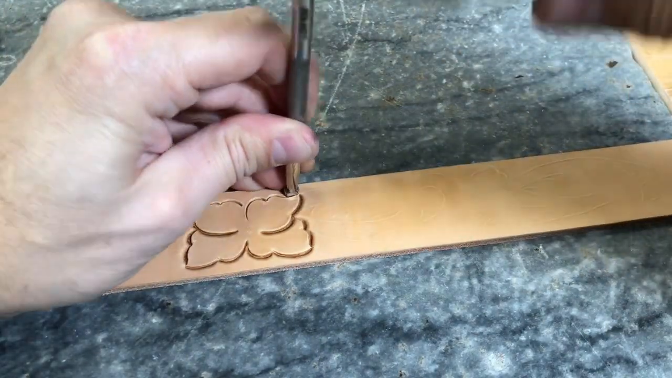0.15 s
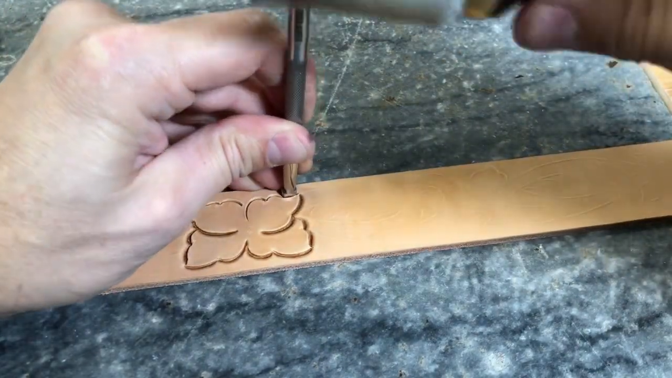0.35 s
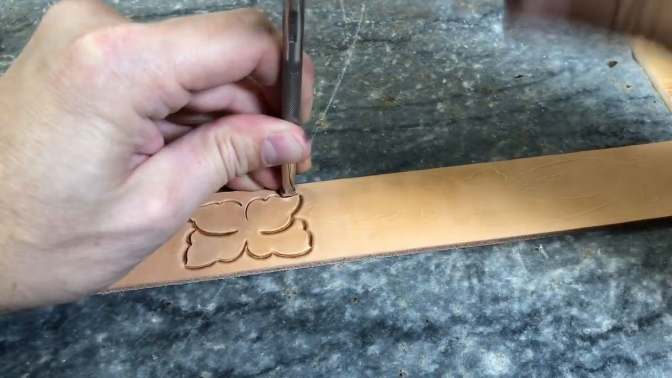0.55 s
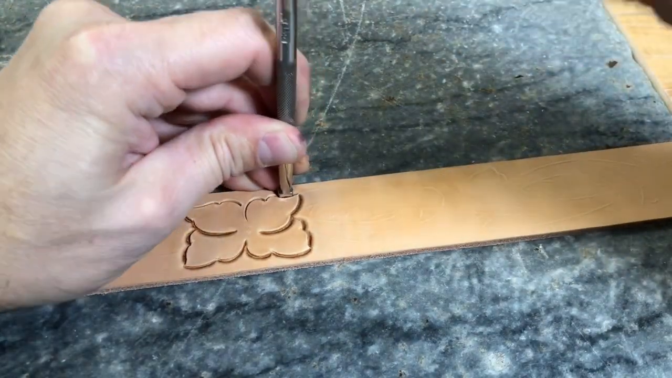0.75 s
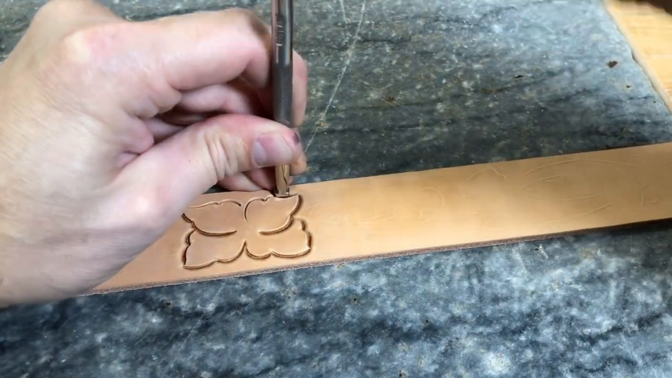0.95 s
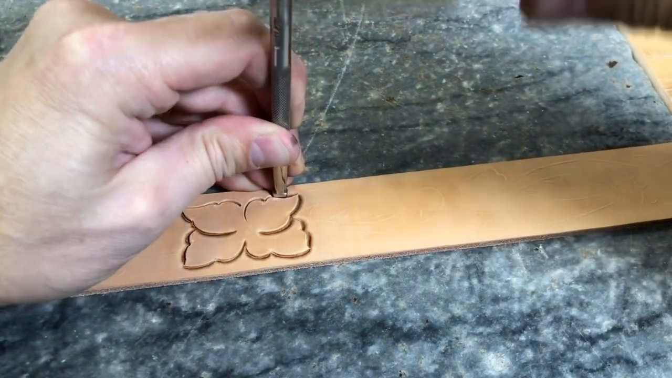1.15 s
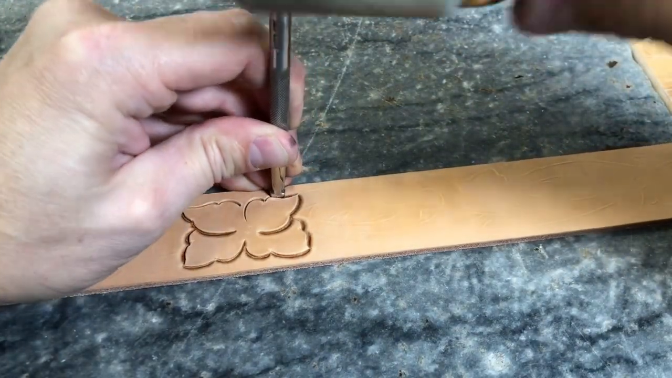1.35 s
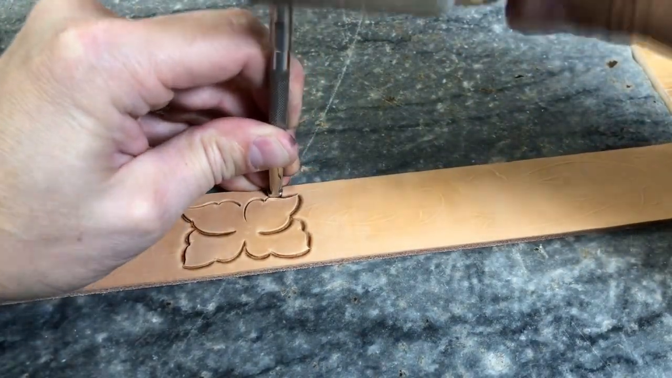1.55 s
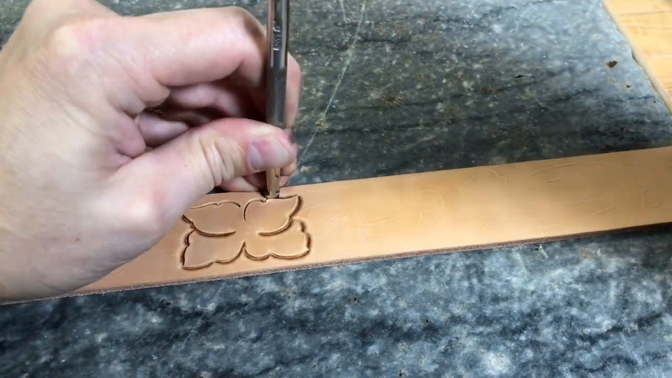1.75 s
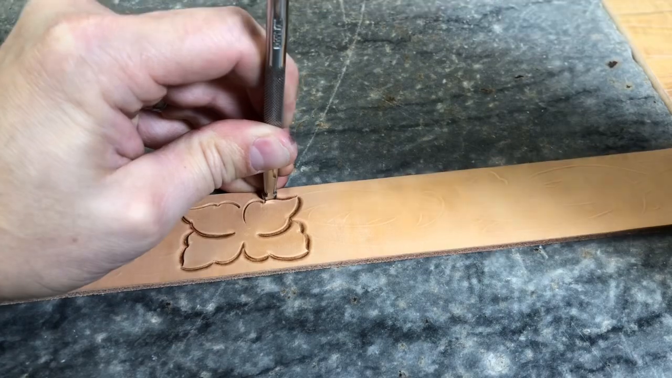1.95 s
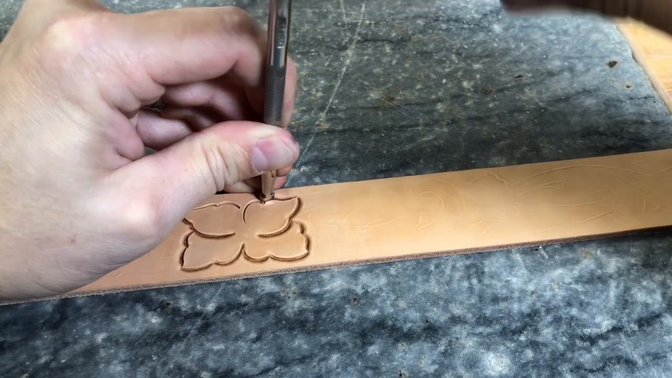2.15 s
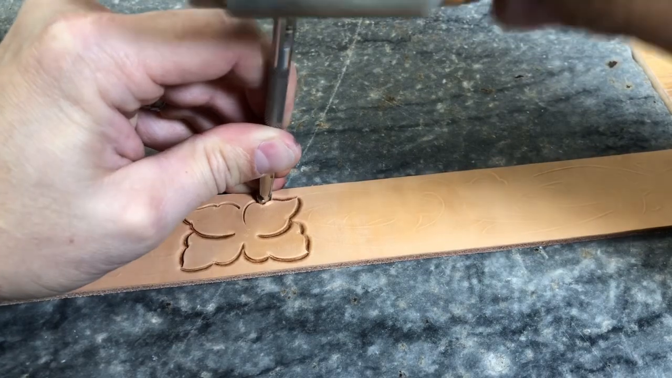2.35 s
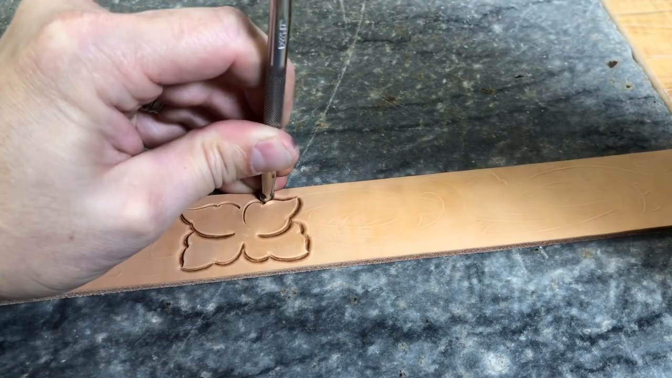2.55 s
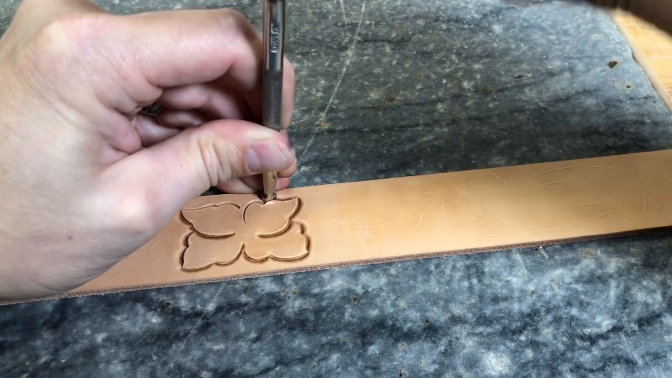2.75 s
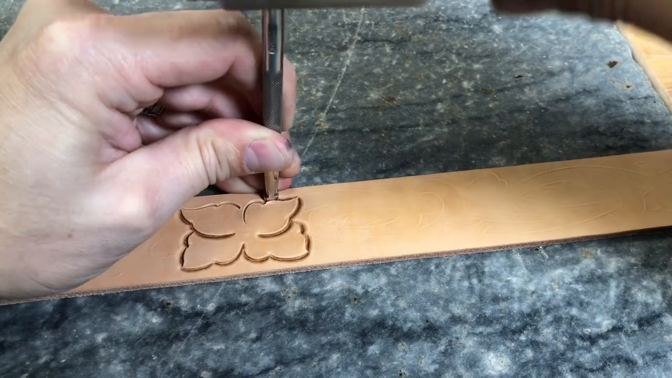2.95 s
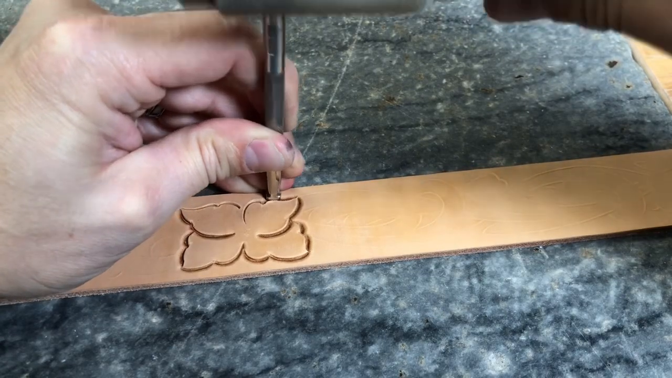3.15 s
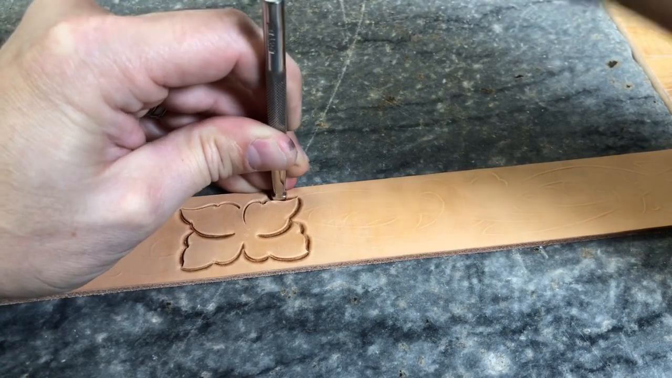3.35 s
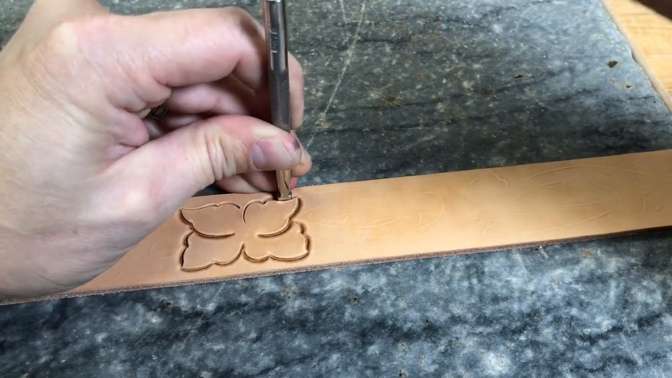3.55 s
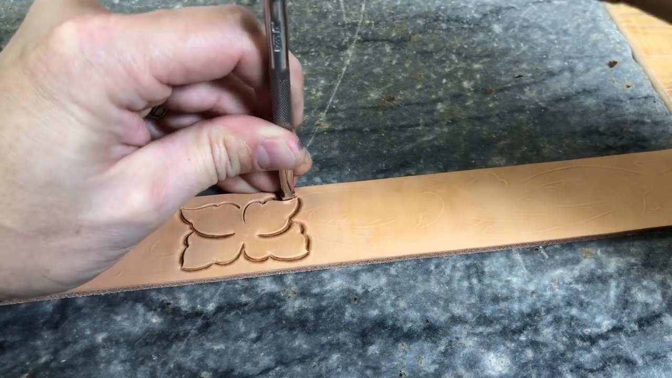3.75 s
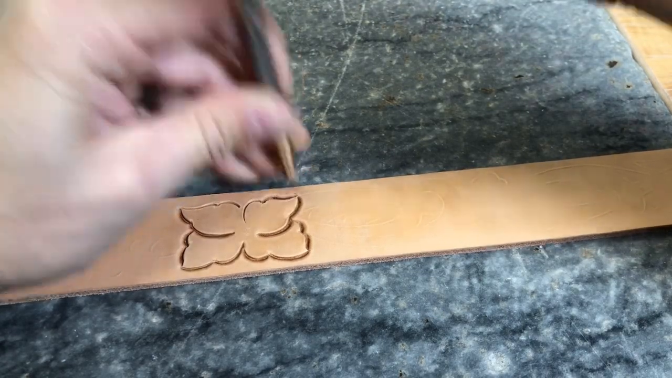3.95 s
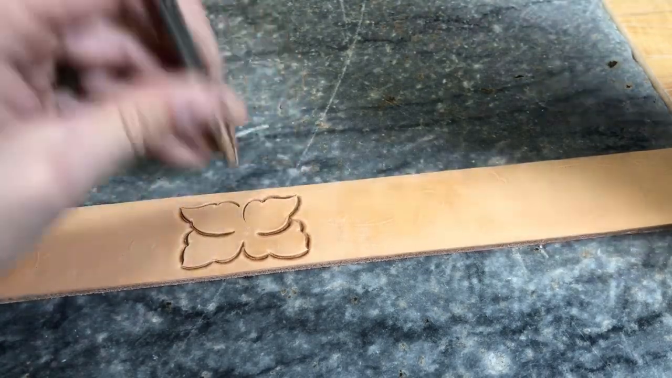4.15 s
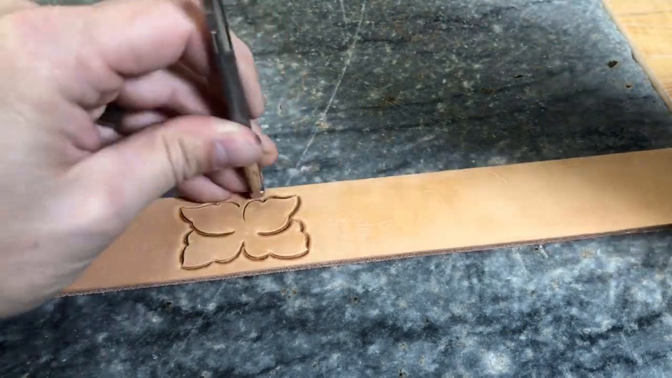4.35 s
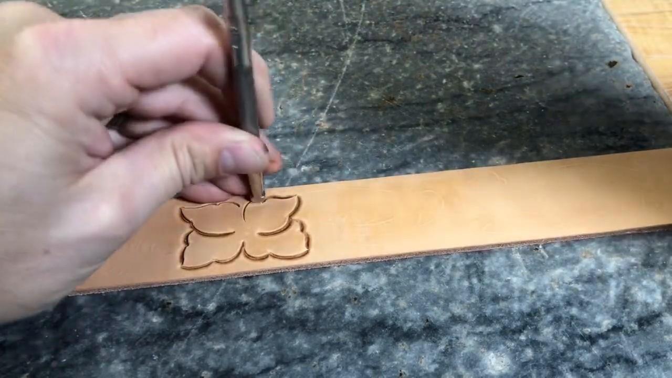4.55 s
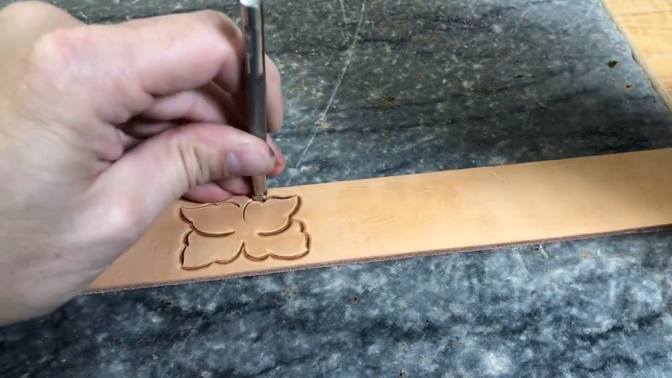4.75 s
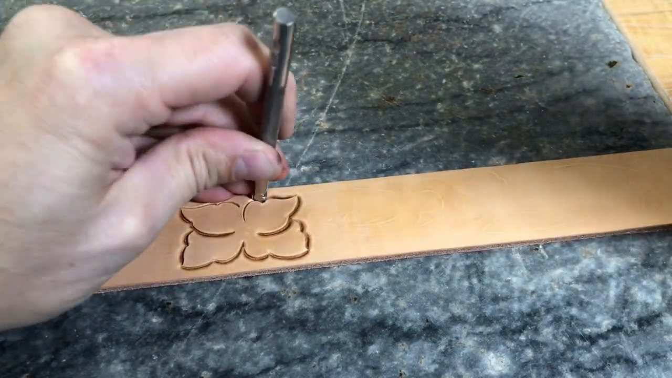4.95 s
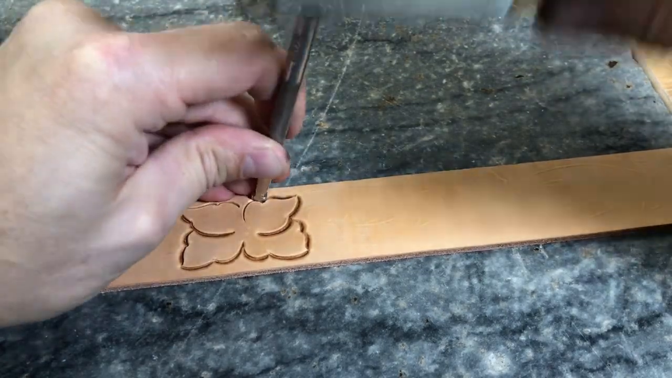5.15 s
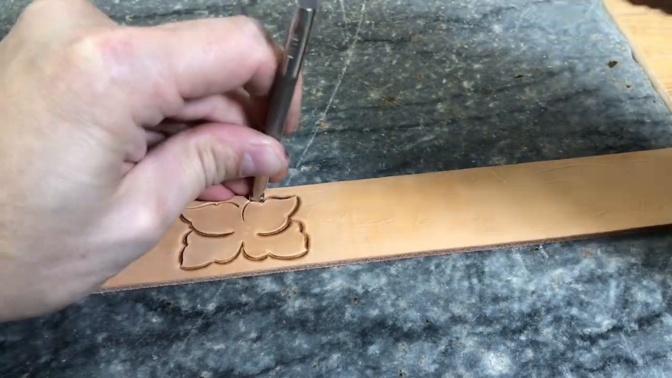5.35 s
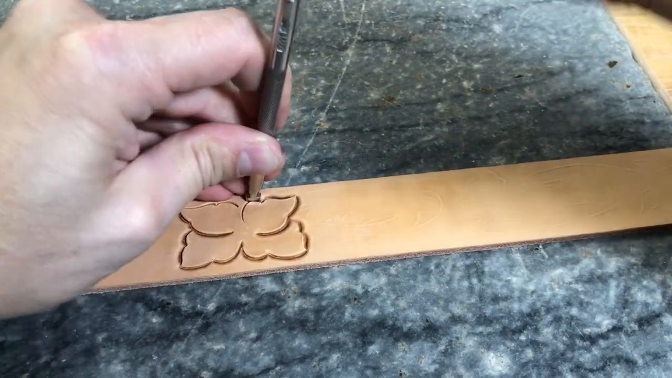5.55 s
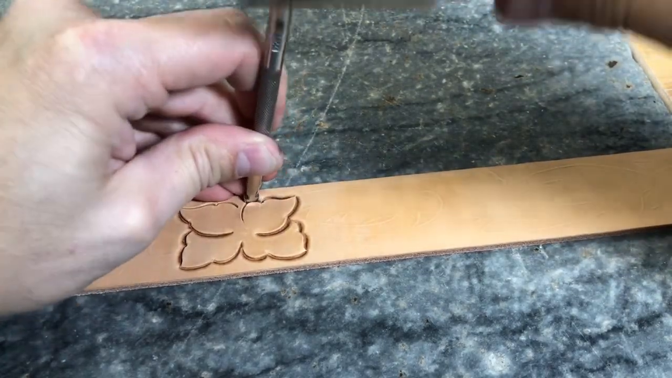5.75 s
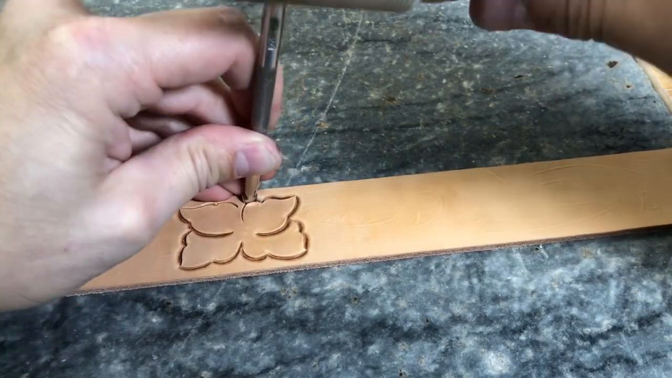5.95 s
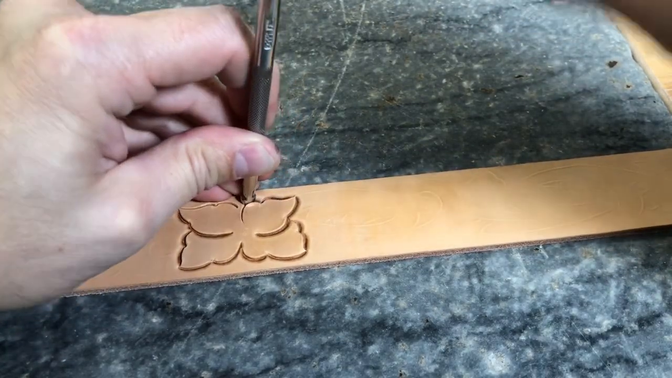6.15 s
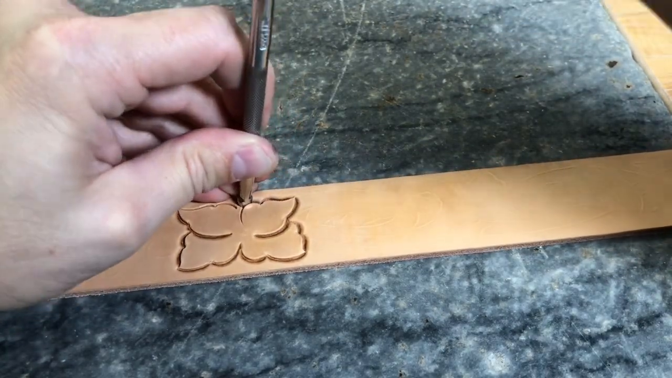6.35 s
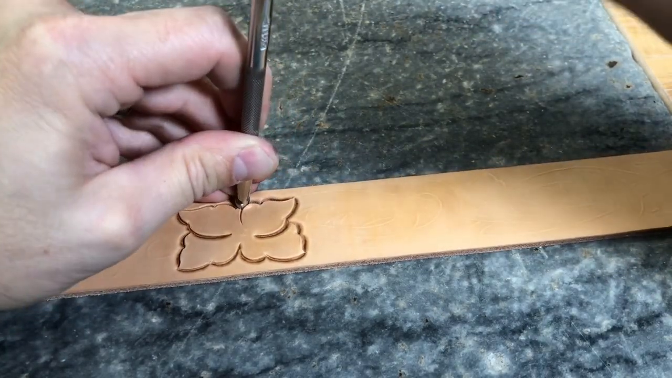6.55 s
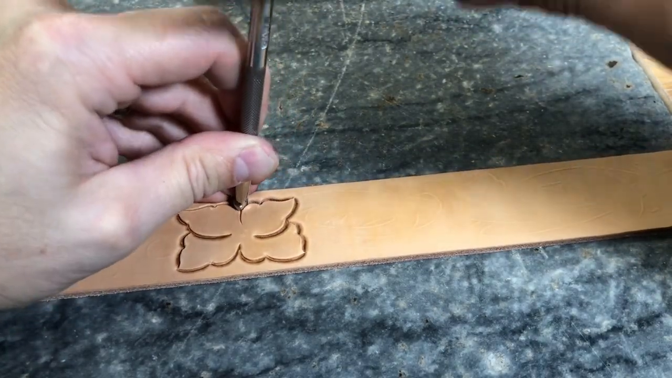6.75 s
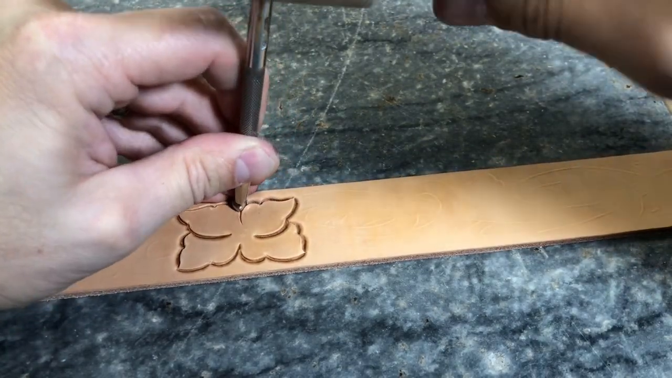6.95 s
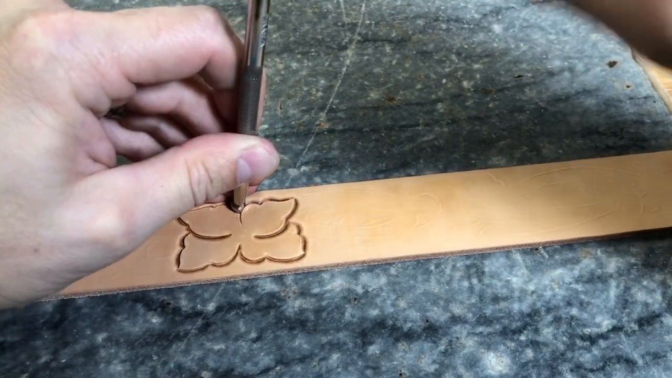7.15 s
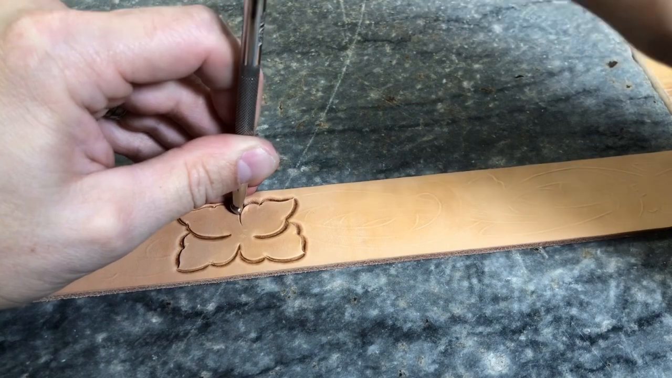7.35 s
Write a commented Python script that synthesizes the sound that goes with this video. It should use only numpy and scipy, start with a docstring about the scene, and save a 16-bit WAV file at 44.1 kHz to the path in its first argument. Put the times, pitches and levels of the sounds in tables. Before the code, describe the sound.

Quiet room air and a low, slowly swelling rumble run throughout. From 0.03 s a mallet strikes a steel tool on leather over a stone slab, one blow every quarter second, very close and peaking into clipping. Each blow is a hard, bright click with a deep push, a dull second touch about 0.04 s later, faint steel ring, short room return and bench hum. A slide accompanies the first blow; stronger knocks fall between blows at 0.86 and 1.1 s. A weaker blow comes at 2.64 s, and the tapping eases until 3.83 s. In the pause, light slides and thin metal ringing come around 4.0-4.2 s, a soft, dull set-down at 4.3, small knocks to 4.7, and three hoarse squeaking slips at 4.84-5.0. A soft blow at 5.15 restarts the tapping, soon full strength, with brief scuffs, more knock in the last blows, continuing to the end around 7.4 s.

```python
"""Over steady room air and a low swelling rumble, a mallet taps a steel beveling tool on leather.
The leather lies on a stone slab on a bench; blows come about four a second and overload the microphone.
Each is a low push, a hard click of mallet and tool, and a hum of bench and room. Between them are slides,
knocks and small ticks, some with thin ringing metal. Near four seconds the blows pause: the tool is set
down and brief slips squeak. After five seconds the tapping resumes and runs to the end."""
import sys
import numpy as np
from scipy import signal
from scipy.fft import rfft, irfft
from scipy.io import wavfile
from scipy.ndimage import uniform_filter1d

SR = 44100
rng = np.random.default_rng(int(sys.argv[2]) if len(sys.argv) > 2 else 0)


def transcribe(u):
    """Save the signal u as a 16-bit wav file named by the first command-line argument.

    u: samples, shape (n,) or (channels, n), limited to [-1, 1]; the rate is SR.
    q: integer samples, one column per channel.
    """
    v = np.clip(np.atleast_2d(u).T, -1, 1)
    q = np.round(v * 32767).astype(np.int16)
    wavfile.write(sys.argv[1], SR, q)


N = 330146


def amp(db):
    """Decibels to gain."""
    return 10 ** (np.asarray(db) / 20)


def unit(x):
    """Scales to an rms of one."""
    return x / np.sqrt(np.mean(x ** 2) + 1e-20)


def read(points, hz):
    """Interpolates a table on a log-frequency axis."""
    table_hz, value = np.transpose(points)
    return np.interp(np.log(hz + 1), np.log(table_hz + 1), value)


def add(mix, start_s, sound):
    """Adds a sound into the mix at a time, cut off at its end."""
    part = mix[max(round(start_s * SR), 0):][:len(sound)]
    part += sound[:len(part)]


def decay(t, t60_s):
    """Exponential fall of 60 dB in t60_s."""
    return np.exp(-np.log(1000) * t / t60_s)


def noise(colour, size):
    """Gaussian noise shaped to a spectrum, at an rms of one."""
    gain = amp(read(colour, np.fft.rfftfreq(size, 1 / SR)))
    return unit(irfft(rfft(rng.standard_normal(size)) * gain, size))


def split(x, edges_hz):
    """Splits into adjoining bands that sum to the whole."""
    hz = np.fft.rfftfreq(len(x), 1 / SR)
    lowpasses = [1 / (1 + (hz / edge_hz) ** 16) for edge_hz in edges_hz]
    below = [0 * hz] + lowpasses + [1 + 0 * hz]
    return irfft(rfft(x) * np.diff(below, axis=0), len(x))


def ring(modes, t):
    """Sums exponentially dying sines at random phases."""
    out = 0
    for hz, db, t60_s in modes:
        out = out + amp(db) * decay(t, t60_s) * np.sin(2 * np.pi * (hz * t + rng.random()))
    return out


# room air spectrum: freq_hz, relative_density_db
AIR_COLOUR = [(20, -0.5), (60, 4), (120, 0), (190, -9.5), (280, -1), (400, -7), (600, -15), (900, -17.5),
              (1300, -27), (2500, -28), (4500, -35), (8000, -35.5), (15000, -44)]
# deep rumble spectrum: freq_hz, relative_density_db
RUMBLE_COLOUR = [(5, -4), (24, -16), (35, -5), (48, -24), (100, -37.5), (400, -69), (2000, -120)]
AIR_DB, RUMBLE_DB, RUMBLE_SWELL_RMS_DB = -50, -40, 2.5


def workshop():
    """Steady coloured noise over a deep rumble whose level wanders with ten slow sines."""
    t = np.arange(N) / SR
    rates_hz = np.geomspace(.6, 3, 10)
    swell = unit(sum(np.sin(2 * np.pi * (hz * t + rng.random())) for hz in rates_hz))
    air = amp(AIR_DB) * noise(AIR_COLOUR, N)
    rumble = amp(RUMBLE_DB + RUMBLE_SWELL_RMS_DB * swell) * noise(RUMBLE_COLOUR, N)
    return air + rumble


def contact(t, hold_s=0.0012, fade_s=0.0017, chatter_gain=0.22, slab_delay_s=.00115, slab_gain=1.0):
    """First touch, its echo off the slab, and a brief noisy chatter of mallet on steel."""
    drive = chatter_gain * rng.standard_normal(len(t)) * np.exp(-np.maximum(t - hold_s, 0) / fade_s)
    drive[0] += 1
    drive[round(slab_delay_s * rng.uniform(.9, 1.1) * SR)] += slab_gain
    return drive


# mallet head modes: ratio_to_pitch, width_hz, relative_db
MALLET_MODES = [(0.928, 281.3, 8.5), (1.06, 283.7, 8.5)]
# modes of the steel tool held on the slab: freq_hz, width_hz, relative_db
TOOL_MODES = [(778, 55, -8), (1205, 200, -9.5), (2820, 120, 2), (3228, 75, 5.5), (3643, 170, -0.5),
              (4910, 490, 4), (5470, 396, 6.5), (6030, 540, 7.5), (7160, 1400, 2), (8890, 830, 4),
              (11220, 670, -0.5), (12500, 1000, -2.5), (15000, 1300, -6.5)]
# edges between click registers: freq_hz
CLICK_EDGES = [1500, 2550, 4300, 9700]


def click(levels_db, mallet_hz):
    """The contact rings damped mallet and tool modes, each register set to its own energy."""
    t = np.arange(2048) / SR
    modes = [(ratio * mallet_hz, width_hz, db) for ratio, width_hz, db in MALLET_MODES] + TOOL_MODES
    body = np.zeros(len(t))
    for k, (hz, width_hz, db) in enumerate(modes):
        damping = np.exp(-np.pi * width_hz * t)
        body += (-1) ** k * amp(db) * width_hz * damping * np.sin(2 * np.pi * hz * t)
    struck = signal.fftconvolve(contact(t), body)[:len(t)]
    padded = np.pad(struck, (len(t), 0))  # silence ahead takes up the filters' pre-ringing
    span = .008 * SR  # levels are rms over 8 ms
    out = np.zeros(len(padded))
    for gain, band in zip(amp(levels_db), split(padded, CLICK_EDGES)):
        out += gain * band * np.sqrt(span / np.sum(band ** 2))
    return out[len(t):]


# low modes of bench and room: freq_hz, relative_db, t60_s
BENCH_MODES = [(33.2, -14.5, 1), (70.7, -13, 0.36), (120, -21, 0.28), (162.4, -16, .33), (230, -10, .36),
               (263.8, -10.5, 0.45), (306, -15.5, 0.44), (334, -13.5, 0.25), (364.6, -18, .4),
               (408, -19, 0.33), (442, -20, 0.22), (479.5, -16, 0.28), (551, -20.5, 0.067),
               (635, -13, 0.16)]
# band between two bench modes where it hardly moves: centre_hz, width_hz
BENCH_NOTCH = (193, 36)
# returns of the push from near surfaces: delay_s, gain_db
PUSH_ECHOES = [(.0073, -25.5), (0.0185, -20.5), (0.0276, -18)]


def thump(push_s=0.0006, push_db=12, slab_hz=420, slab_db=-4, slab_decay_s=0.0093,
          build_s=0.00034, bench_db=-1):
    """The slab is pushed down and springs back; near surfaces answer and the bench hums on."""
    t = np.arange(SR) / SR
    u = t / push_s
    push = -amp(push_db) * (3 - u) * u ** 2 * np.exp(-u)
    slab = -amp(slab_db) * np.sin(2 * np.pi * slab_hz * t) * np.exp(-t / slab_decay_s) * (1 - np.exp(-u))
    bench = amp(bench_db) * ring(BENCH_MODES, t) * (1 - np.exp(-t / build_s))
    out = push + slab + bench
    for delay_s, db in PUSH_ECHOES:
        add(out, delay_s, amp(db) * push)
    notch_hz, width_hz = BENCH_NOTCH
    return signal.lfilter(*signal.iirnotch(notch_hz, notch_hz / width_hz, fs=SR), out)


# decay of the room: freq_hz, t60_s
ROOM_DECAY = [(200, 0.037), (1000, 0.31), (2000, 0.28), (3700, 0.27), (7000, 0.19), (15000, 0.38)]


def room_tail(colour, onset_s=0.0012):
    """Dense reflections with a given gain by frequency, each band dying at its own speed."""
    size = SR // 2
    hz, t, z = signal.stft(rng.standard_normal(size), SR, nperseg=512)
    rate = np.log(1000) / read(ROOM_DECAY, hz)[:, None]
    z = z * colour(hz)[:, None] * np.exp(-rate * t) * np.sqrt(2 * rate / SR)  # equal energy at any decay
    tail = signal.istft(z, SR, nperseg=512)[1][:size]
    return tail * np.minimum(np.arange(size) / (onset_s * SR), 1) ** 2


# mallet blows, relative to an ordinary one: start_s, force_db, mallet_knock_db, top_fizz_db, mallet_pitch_hz
MALLET_BLOWS = [(.034, -.5, 3, -5.5, 2050), (.294, 0.5, -3.5, 5.5, 1900), (0.5416, 2, 0.5, 2, 2060),
                (0.7857, 1, -3, -3.5, 1900), (1.0362, 0, -3.5, -2, 1950), (1.276, 1.5, 0, -2.5, 2010),
                (1.528, 1.5, -1, -1, 2030), (1.7815, 1.5, -2.5, 0, 2060), (2.0326, 1.5, -2.5, 3, 1940),
                (2.2826, -0.5, 0.5, -2, 2280), (2.6436, -7.5, -3, 4.5, 2120), (2.874, 0, -3, -5, 2050),
                (3.1234, 0.5, -4, -1, 2090), (3.3612, -1, -3.5, 2, 2060), (3.6024, -2, -4.5, 4, 2080),
                (3.8304, -3, -2, 5.5, 2150), (5.1463, -9, -2, 0, 2165), (5.3992, -2, 3, -1.5, 2100),
                (5.652, 0.5, -1, 4, 1960), (5.9066, -0.5, -1.5, 2.5, 2030), (6.1568, 0.5, -2.5, 3, 2250),
                (6.4093, 0, 4, 2, 2080), (6.6572, 0.5, 3.5, 3, 2160), (6.906, .5, 3.5, 0.5, 1980),
                (7.1593, 1, 3.5, -1, 2020), (7.4024, 1, 5.5, 0, 2160)]
# click registers, low to high (body, mallet knock, tool clack, snap, top fizz):
# ordinary_db, db_per_force_db, db_per_knock_db, db_per_fizz_db
# harder blows are brighter; a stronger mallet knock comes with less body and slightly less tool clack
CLICK_REGISTERS = [(-28.5, 0.57, -0.84, 0), (-21, 0.5, 1, 0), (-20.5, 1.3, -0.37, 0.11),
                   (-20, 1.72, 0, 0.51), (-29, 1.5, 0.11, 1)]
# faint lasting ring of the steel: nominal_hz, nominal_db (re thump), t60_s
STEEL_MODES = [(2680, -31.5, .12), (3060, -27.5, .28), (3490, -25, 0.13), (3690, -23.5, 0.24),
               (4040, -30.5, 0.13)]
# returns of the click from near surfaces: delay_s, gain_db
NEAR_CLICKS = [(0.0107, -14.5), (.0135, -19.5)]
# room return of the click: freq_hz, gain_db (re direct sound)
CLICK_RETURN = [(200, -10), (700, -3), (1300, -14.5), (2000, -16.5), (2500, -11), (3200, -11), (3850, -4.5),
                (4600, -13), (6000, -17.5), (8000, -19), (11000, -24.5), (15000, -20.5)]
# diffuse boom after a thump: freq_hz, relative_db
BOOM_COLOUR = [(40, -14), (100, -8.5), (165, -9), (195, -16.5), (245, 1), (450, 11.5), (640, -1.5),
               (800, -13), (2000, -64.5)]
THUMP_DB = -15.5  # ordinary blow
THUMP_LAG_S = 0.00076  # the push reaches the slab just after the click


def tapping(boom_db=25.5, steel_db_per_knock_db=-.2, grip_sd_db=2, rebound_min_s=0.033,
            rebound_mean_db=-14, rebound_db_per_knock_db=0.37):
    """Mallet blows: click, thump, steel ring, echoes, room and a soft second touch."""
    out, t = np.zeros(N), np.arange(SR // 2) / SR
    for start_s, force_db, knock_db, fizz_db, mallet_hz in MALLET_BLOWS:
        thump_db = THUMP_DB + force_db
        direct = click(np.dot(CLICK_REGISTERS, [1, force_db, knock_db, fizz_db]), mallet_hz)
        add(out, start_s, direct)
        add(out, start_s + THUMP_LAG_S, amp(thump_db) * thump())

        # the fingers hold the steel a little differently each time
        held = [(hz * rng.normal(1, 0.011), db + rng.normal(0, grip_sd_db), t60_s)
                for hz, db, t60_s in STEEL_MODES]
        add(out, start_s, amp(thump_db + steel_db_per_knock_db * knock_db) * ring(held, t))
        for delay_s, db in NEAR_CLICKS:
            add(out, start_s + delay_s, amp(db) * uniform_filter1d(direct, size=6))

        # the room gathers the click from every direction: only its broad colour returns
        bins_hz = np.fft.rfftfreq(len(direct), 1 / SR)
        broad = np.sqrt(np.abs(uniform_filter1d(np.abs(rfft(direct)) ** 2, size=40)))
        add(out, start_s, room_tail(lambda hz: np.interp(hz, bins_hz, broad) * amp(read(CLICK_RETURN, hz))))
        add(out, start_s, room_tail(lambda hz: amp(thump_db + boom_db + read(BOOM_COLOUR, hz))))

        # the mallet bounces back and lands again with a soft, dull second touch
        settle_db = rebound_mean_db + rebound_db_per_knock_db * knock_db + rng.normal(0, 3.3)
        settle_s = start_s + rebound_min_s * rng.uniform(1.0, 1.4)
        add(out, settle_s, amp(settle_db) * uniform_filter1d(direct, size=17))
    return out


def grainy_noise(colour, bright_db, treble_db, size, grain_db=1.5):
    """Diffuse, grainy noise; brightness tips it from body towards treble."""
    bands = split(noise(colour, size), [1500, 6000])
    grain = amp(grain_db * unit(uniform_filter1d(rng.standard_normal(size), size=110)))
    band_levels_db = [-bright_db, 0, treble_db + bright_db]
    return unit(grain) * sum(amp(db) * unit(band) for db, band in zip(band_levels_db, bands))


def stroke(length_s, t60_s, grain_db=2, curve=1.2):
    """Envelope of a slide: it swells with an uneven grip, then fades in the room."""
    t = np.arange(SR) / SR
    grip = amp(grain_db * unit(uniform_filter1d(rng.standard_normal(SR), size=250)))
    return grip * np.minimum(t / length_s, 1) ** curve * decay(np.maximum(t - length_s, 0), t60_s)


# things slid about: start_s, length_s, level_db, brightness_db
SLIDES = [(0.051, .1, -38.5, 4.5), (4.011, 0.09, -62.5, 2.5), (4.162, 0.11, -49.5, 8),
          (5.426, 0.13, -44, 2), (5.926, 0.08, -50, -2.5), (7.209, 0.027, -57, -7)]
# rasp spectrum: freq_hz, relative_db
RASP_COLOUR = [(200, -10), (500, -7), (1400, -1), (2000, 3.5), (3200, 3), (4000, -1.5), (5500, -9),
               (10000, -17), (14500, -20.5)]
RUB_T60_S, RUB_TREBLE_DB = 0.33, -5.5


def rubs():
    """Sliding strokes: swelling and fading noise, a rasp with some hiss."""
    out = np.zeros(N)
    for start_s, length_s, level_db, bright_db in SLIDES:
        rasp = grainy_noise(RASP_COLOUR, bright_db, RUB_TREBLE_DB, SR)
        add(out, start_s, amp(level_db) * stroke(length_s, RUB_T60_S) * rasp)
    return out


# knocks and small ticks, including a bright rebound tick just after the 2.28 s blow:
# start_s, base_level_db, t60_s, brightness_db, metal_ring_db (re base)
KNOCKS_AND_TICKS = [(0.488, -53, 0.19, 1, -41), (.861, -14.5, 0.24, 0.5, -26),
                    (.929, -33.5, 0.37, -1.5, -42), (1.102, -24.5, 0.31, 0.5, -24),
                    (1.224, -34, 0.54, -2, -17), (1.634, -45, 0.22, -10.5, -34),
                    (2.342, -51, 0.046, 18.5, -37), (2.535, -62, 0.19, -8.5, -36.5),
                    (4.181, -47.5, 0.84, -5.5, 4.5), (4.294, -42, 0.24, -13, -42),
                    (4.548, -53.5, 0.32, 2, -32.5), (4.733, -41.5, 0.37, 2.5, -45),
                    (5.559, -53, .35, -5.5, 1)]
# knock spectrum: freq_hz, relative_db
CLATTER_COLOUR = [(150, -38.5), (300, -15.5), (450, -1), (650, -3), (800, 3), (1050, -7), (2000, -2),
                  (3700, -1), (5500, -6.5), (7500, 6), (15000, -3.5)]
# thin metal modes: freq_hz, relative_db, t60_s
METAL_MODES = [(8010, 6, 0.56), (8000, -4.5, 0.97), (11100, 6, 0.33), (11250, 4.5, .3), (14400, 7, .34),
               (14560, 0, .3)]
KNOCK_RISE_S, KNOCK_TREBLE_START_DB, KNOCK_DULLING_DB_PER_S = .003, -15.5, 54.5


def knocks(ring_rise_s=0.015, flutter_depth=.9, clatter_db=2.0):
    """Knocks and small ticks as dulling diffuse noise, with thin metal that flutters in the room."""
    out, t = np.zeros(N), np.arange(SR) / SR
    treble_db = KNOCK_TREBLE_START_DB - KNOCK_DULLING_DB_PER_S * t
    for start_s, base_db, t60_s, bright_db, ring_db in KNOCKS_AND_TICKS:
        envelope = (1 - np.exp(-t / KNOCK_RISE_S)) * decay(t, t60_s)
        clatter = grainy_noise(CLATTER_COLOUR, bright_db, treble_db, len(t))
        add(out, start_s, amp(base_db + clatter_db) * envelope * clatter)

        slow_noise = uniform_filter1d(rng.standard_normal((len(METAL_MODES), len(t))), size=800)
        wavers = 1 + flutter_depth * unit(slow_noise)
        metal = sum(waver * ring([mode], t) for mode, waver in zip(METAL_MODES, wavers))
        metal = metal / np.hypot(1, flutter_depth)
        add(out, start_s, amp(base_db + ring_db) * metal * (1 - np.exp(-t / ring_rise_s)))
    return out


# tool set down in the pause: start_s, thump_db, lowest_register_db
TOOL_SET_DOWN = (4.295, -38.5, -36.5)
SET_DOWN_DULLING_DB = 10  # drop from each register to the next


def set_down(mallet_hz=1850):
    """The tool meets the leather with a light, dull touch: a weak thump and click."""
    out, (start_s, thump_db, click_db) = np.zeros(N), TOOL_SET_DOWN
    levels_db = click_db - SET_DOWN_DULLING_DB * np.arange(len(CLICK_REGISTERS))
    add(out, start_s, amp(thump_db) * thump())
    add(out, start_s, click(levels_db, mallet_hz))
    return out


# short squeaking slips: start_s, level_db
SLIPS = [(4.84, -49.5), (4.915, -48), (4.976, -46.5)]
# squeak spectrum: freq_hz, relative_db
SQUEAK_COLOUR = [(500, -54), (1900, -7), (2400, 13), (2900, -15), (6000, -42.5)]
SQUEAK_RISE_S, SQUEAK_T60_S = 0.018, 0.34


def squeaks(rasp_db=-4):
    """Brief slips: narrow noise gives a hoarse squeak over a little rasp."""
    out = np.zeros(N)
    for start_s, level_db in SLIPS:
        hoarse = noise(SQUEAK_COLOUR, SR) + amp(rasp_db) * noise(RASP_COLOUR, SR)
        add(out, start_s, amp(level_db) * stroke(SQUEAK_RISE_S, SQUEAK_T60_S) * hoarse)
    return out


def scene():
    """Sums the workshop, the close tapping, the slides, knocks and ticks, the set-down and the squeaks."""
    return (workshop() + tapping() + rubs() + knocks() + set_down() + squeaks())[None]


EDGE_HZ = 16000


def record(dry):
    """The microphone clips the hardest peaks; a linear-phase lowpass then limits the band."""
    clipped = np.clip(dry, -1, 1)
    lowpass = signal.firwin(255, EDGE_HZ, window=("kaiser", 8), fs=SR)
    return signal.oaconvolve(clipped, lowpass[None], "same")


dry = scene()
out = record(dry)
transcribe(out)
```